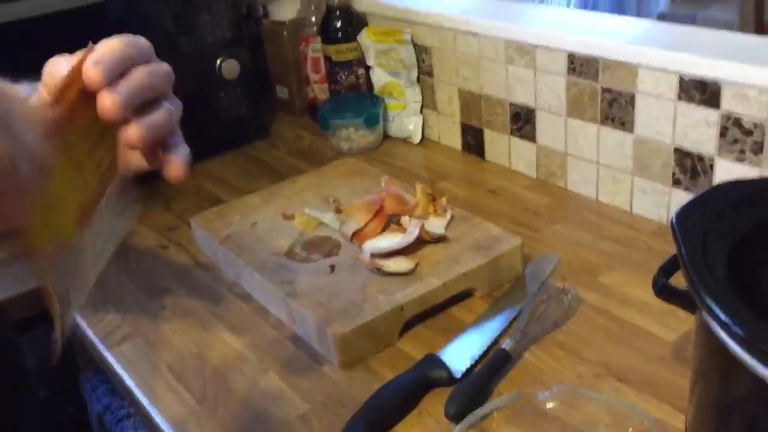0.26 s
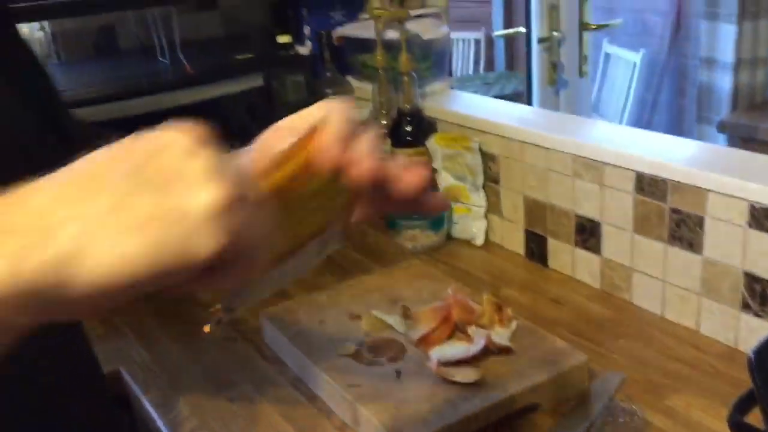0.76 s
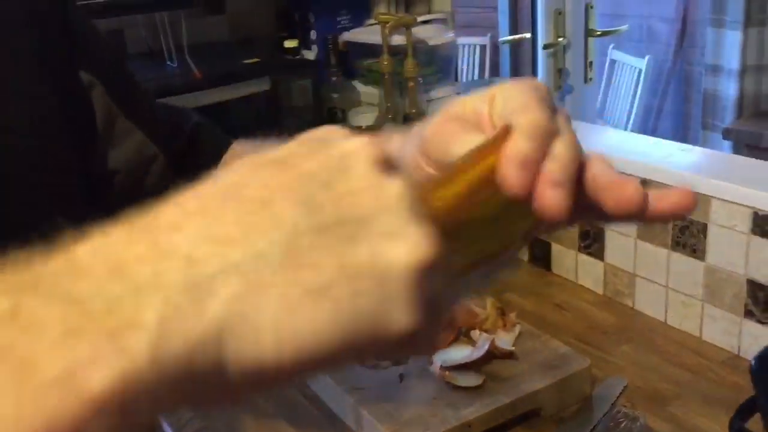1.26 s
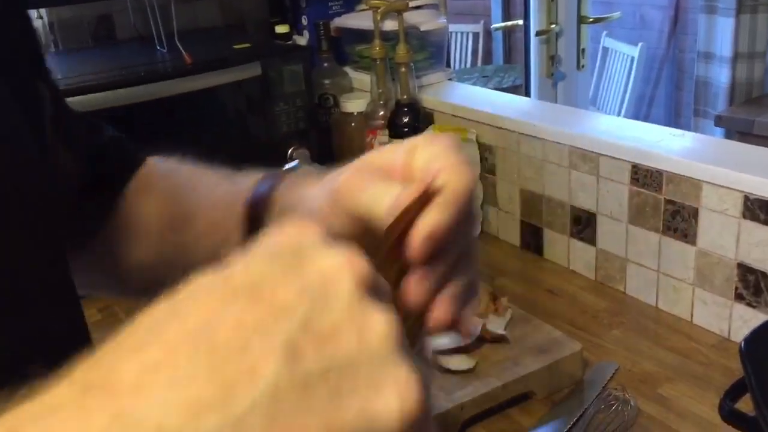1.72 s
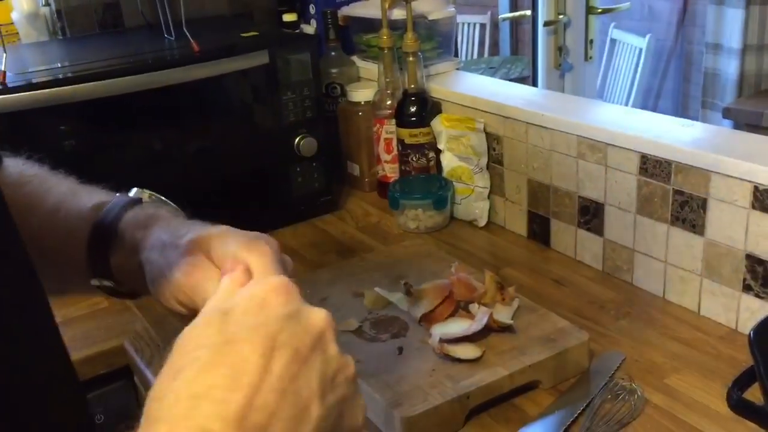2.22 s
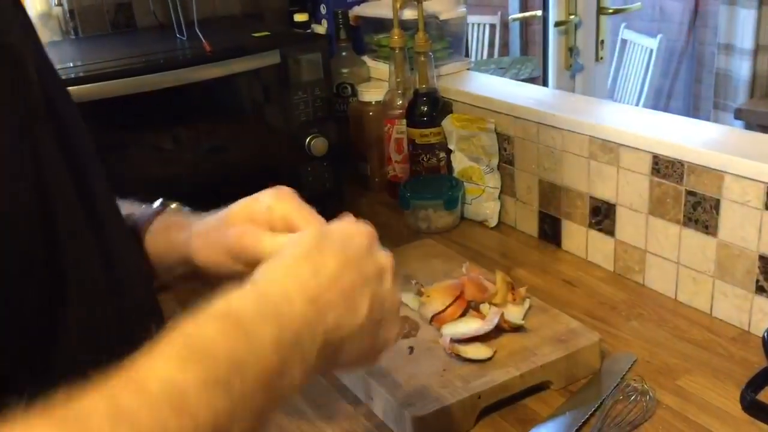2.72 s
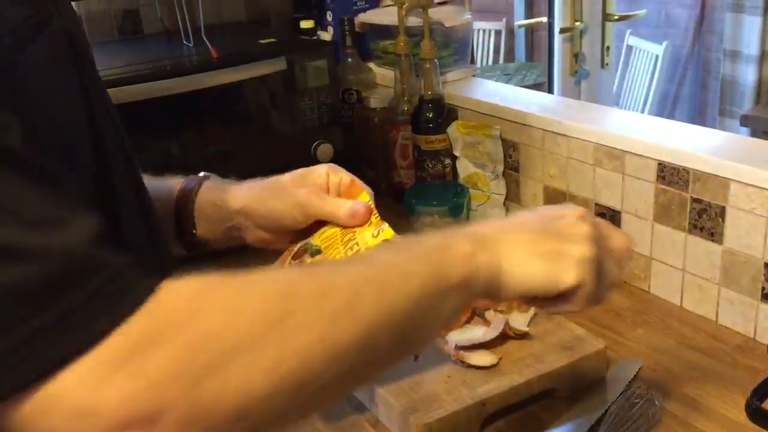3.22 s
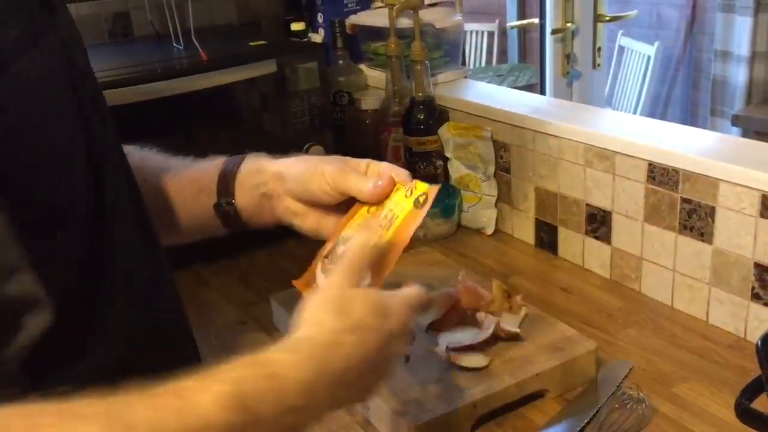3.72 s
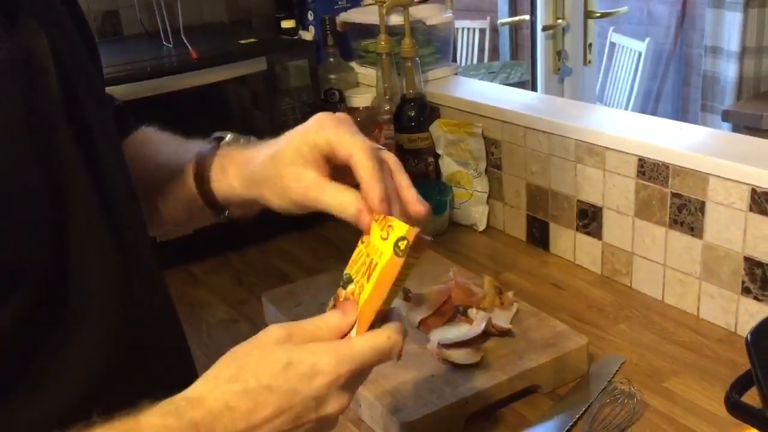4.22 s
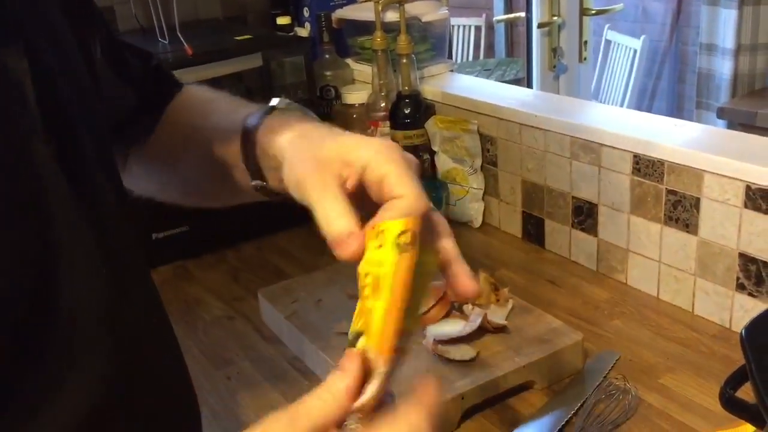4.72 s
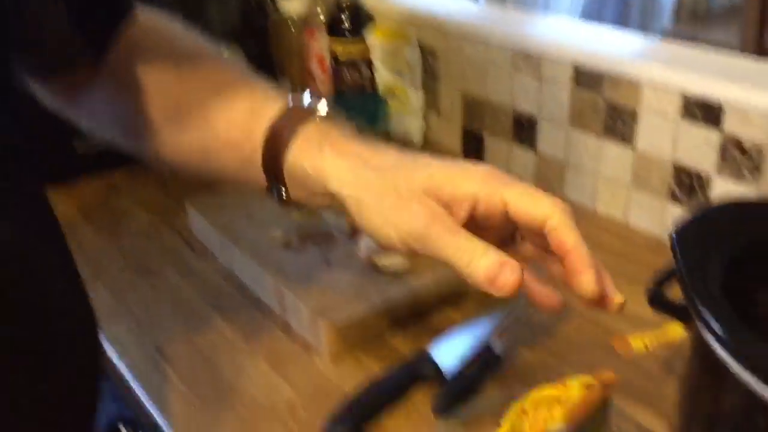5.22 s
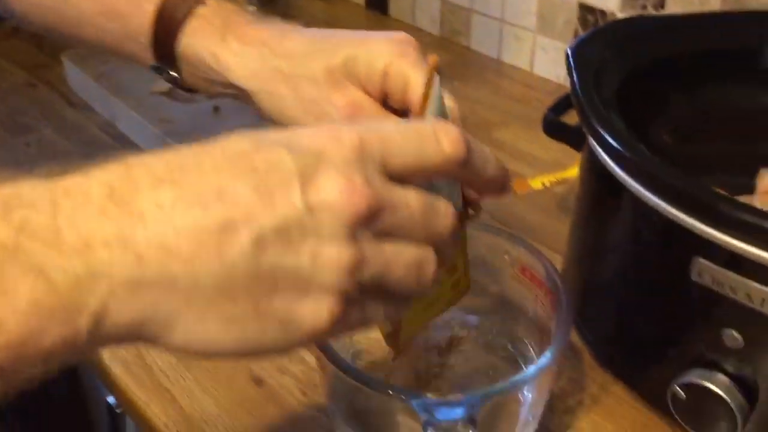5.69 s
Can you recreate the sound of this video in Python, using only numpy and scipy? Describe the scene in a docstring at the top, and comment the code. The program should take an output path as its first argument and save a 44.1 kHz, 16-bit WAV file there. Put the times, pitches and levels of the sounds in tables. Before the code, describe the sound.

A small, quiet kitchen, heard by one close microphone, with short hard reflections and faint room air. From 0 to 0.3 s a foil-paper sachet gives light rustles and a few ticks. From about 0.35 to 1.8 s it is vigorously crumpled: dense, irregular, sharp snaps and papery pops over fine crackle, loudest around 0.75 to 1.6 s, with soft dull hand pushes beneath. From 1.8 to 2.95 s the crackling thins to separate snaps with gaps. At about 2.98 to 3.2 s a quick, gritty rip tears the top off, ending in a tiny flick. Near silence follows, with a small tick around 3.55 s. From 3.85 to 5.2 s come sparse, lighter crinkles and pops, brightest near 4.04 and 4.87 s. Around 5.4 s powder slides with a short fizz over a dull low thump; faint hollow knocks follow, then soft crinkles and a weak glass ring at 5.8 s.

```python
"""In a small kitchen, hands shake down and crumple a foil-paper sachet, tear off its top and pinch it open.
The film buckles in sharp snaps over a fine crackle: bursts of random slips and breaks, coloured by rings.
The tear is a dense run of tiny breaks; soft pushes of the hands are short puffs of noise.
At the end powder slides inside as a fizz, and the sachet brushes a glass jug, a dying sine tone.
Echoes and a short tail make the kitchen answer; one microphone hears it all, over quiet room air."""
import sys
import numpy as np
from scipy import signal
from scipy.fft import rfft, irfft
from scipy.io import wavfile
from scipy.ndimage import uniform_filter1d

SR = 44100
rng = np.random.default_rng(int(sys.argv[2]) if len(sys.argv) > 2 else 0)


def digitize_waveform(pressure):
    """Quantize a signal to 16-bit integers and store it at the path in sys.argv[1].

    Rows of a 2-D input are taken as channels; values are limited to [-1, 1].
    """
    field = np.atleast_2d(pressure).T
    bounded = np.clip(field, -1, 1)
    quanta = np.round(bounded * 32767).astype(np.int16)
    wavfile.write(sys.argv[1], SR, quanta)


N = 262527
TIME = np.arange(N) / SR  # s


def amp(db):
    """Decibels to gain."""
    return 10 ** (np.asarray(db) / 20)


def unit(x):
    """x at rms 1."""
    return x / np.sqrt(np.mean(x ** 2) + 1e-20)


def read(points, hz):
    """A table of (Hz, value) read on a log-frequency axis."""
    f, value = np.transpose(points)
    return np.interp(np.log(hz + 1), np.log(f + 1), value)


def add(mix, s, sound):
    """Mixes a sound in at time s."""
    part = mix[max(round(s * SR), 0):][:len(sound)]
    part += sound[:len(part)]


def swell(start, length, rise_db_per_s, fall_db_per_s):
    """Attack, hold and release, in dB relative to the held level."""
    before = np.maximum(start - TIME, 0)
    after = np.maximum(TIME - start - length, 0)
    return -rise_db_per_s * before - fall_db_per_s * after


def causal(db_of_hz, size=2048):
    """The shortest causal ring that has a given spectrum (minimum phase); energy 1."""
    db = db_of_hz(np.fft.rfftfreq(size, 1 / SR))
    cepstrum = irfft(np.log(amp(np.maximum(db - db.max(), -100))))
    # folding the cepstrum forward in time packs the energy at the start
    cepstrum[1:size // 2] *= 2
    cepstrum[size // 2 + 1:] = 0
    ring = irfft(np.exp(rfft(cepstrum)))
    return ring / np.linalg.norm(ring)


def coloured(x, points):
    """x through a spectrum, at rms 1."""
    ring = causal(lambda hz: read(points, hz))
    return unit(signal.oaconvolve(x, ring)[:N])


def ringing(modes):
    """Half a second of dying sine tones (pitch_hz, level_db, t60_s: the time to fall 60 dB)."""
    t = np.arange(SR // 2) / SR
    return sum(amp(db - 60 * t / t60) * np.sin(2 * np.pi * hz * t) for hz, db, t60 in modes)


def resonate(x, hz, width_hz):
    """One resonance of gain 1 that follows the curve hz: shift down to 0 Hz, smooth, shift back."""
    turn = np.exp(2j * np.pi * np.cumsum(hz) / SR)
    r = np.exp(-np.pi * width_hz / SR)
    return 2 * (turn * signal.lfilter([1 - r], [1, -r], x / turn)).real


def breaks(per_s, spread_db, most=2.8):
    """Random tiny breaks of either sign, a few much larger than the rest."""
    size = amp(spread_db * np.minimum(rng.exponential(1, N), most))
    return size * rng.choice([-1, 1], N) * (rng.random(N) < per_s / SR)


def patch(hz, centre_hz, below, above, knee=0.16, bass_hz=320):
    """Spectrum (dB) of a flexing patch of film: one broad peak; too small to radiate bass."""
    octaves = np.log2((hz + 1) / centre_hz)
    away = np.hypot(octaves, knee)  # distance from the centre, rounded at the peak
    flanks = max(below, 0) * (away - octaves) + max(above, 0) * (away + octaves)  # slopes in dB/octave
    bass_loss = 10 * np.log10(1 + (bass_hz / (hz + 1)) ** 3)
    return -flanks / 2 - bass_loss


def bump(hz, ring_hz, octaves=0.19):
    """Shape of one resonance of a patch, 0 to 1."""
    return np.exp(-(np.log2((hz + 1) / ring_hz) / octaves) ** 2 / 2)


def film(spectrum_db, bumps_db, size=2048):
    """Ring of one crease: chance resonances on its spectrum; bending waves bring the treble first."""
    grid = np.geomspace(200, 20000, 18)  # Hz
    bumps = np.transpose([grid, bumps_db * rng.standard_normal(len(grid))])
    ring = causal(lambda hz: spectrum_db(hz) + read(bumps, hz))
    hz = np.fft.rfftfreq(size, 1 / SR)
    lag_at_1k = rng.uniform(.0002, .0006)  # s; lower pitches lag more
    return irfft(rfft(ring) * np.exp(-4j * np.pi * lag_at_1k * np.sqrt(1000 * hz)))


def crackle(per_s, spread_db, colour, slope=11, count=32):
    """Tiny breaks shared among patches of film of different sizes."""
    out = np.zeros(N)
    for centre_hz in np.geomspace(450, 13000, count):  # small patches ring high, large ones low
        ring = film(lambda hz: patch(hz, centre_hz, slope, slope) + read(colour, hz) / 2, bumps_db=2.0)
        weight = amp(read(colour, centre_hz)) * np.sqrt(centre_hz)
        out += weight * signal.oaconvolve(breaks(per_s / count, spread_db), ring)[:N]
    return unit(out)


def room_air():
    """Quiet room air: steady coloured noise."""
    # spectrum of the quiet room: pitch_hz [Hz], level_db [relative dB]
    air_colour = [(20, -37), (45, -9), (90, 0), (160, -2.5), (350, -8.5), (700, -11.5), (1500, -11),
                  (4000, -15), (10000, -20), (16000, -25)]
    return amp(-69.5) * coloured(rng.standard_normal(N), air_colour)


def effort():
    """Levels (dB) of the creasing and of the fizz, following the finger strokes and the sliding powder."""
    # strokes of the fingers: start_s [s], length_s [s], crease_level_db [dB],
    # fizz_level_db of powder and fibres [dB]
    strokes = [(0.0, 0.046, -55, -60), (0.104, 0.075, -71, -59), (0.243, 0.018, -46.5, -57),
               (0.346, 0.34, -43.5, -50.5), (0.703, 0.21, -40.5, -46), (0.945, 0.43, -45, -44),
               (1.425, 0.32, -45.5, -54), (1.797, 0.1, -52.5, -82), (1.935, 0.16, -51, -60.5),
               (2.197, 0.019, -80, -58), (2.305, 0.18, -58, -65), (2.6, 0.056, -49, -56),
               (2.647, 0.057, -52, -47), (2.825, .15, -46, -53.5), (3.789, .07, -74, -67),
               (3.862, 0.054, -58, -58.5), (4.018, 0.13, -60, -55), (4.15, 0.043, -69, -59.5),
               (4.289, 0.013, -56.5, -52), (4.567, 0.31, -70, -67), (4.775, 0.093, -48.5, -56.5),
               (4.99, 0.11, -67, -66), (5.134, 0.009, -69, -55.5), (5.44, 0.091, -65, -73),
               (5.517, 0.2, -73.5, -68), (5.769, 0.11, -65, -55), (5.896, 0.037, -61, -56.5)]
    grip_db_per_s, relax_db_per_s = 815, 458.5  # how fast a stroke swells and dies away
    crease = np.full(N, -140.)
    # powder slides to one end as the sachet is tipped: level in dB, times in s, slopes in dB/s
    fizz = -55 + swell(5.41, 0.079, rise_db_per_s=196, fall_db_per_s=400)
    for start, length, crease_db, fizz_db in strokes:
        shape = swell(start, length, grip_db_per_s, relax_db_per_s)
        crease = np.maximum(crease, crease_db + shape)
        fizz = np.maximum(fizz, fizz_db + shape)
    return crease, fizz


def clumps(depth_db=3, length_s=.007):
    """The film gives way in fits and starts: a gain that jumps about quickly, at rms 1."""
    knots = rng.standard_normal(N // 100)
    return unit(amp(depth_db * np.interp(TIME / length_s, np.arange(len(knots)), knots)))


def handling(level, fizz, rub_db=-16):
    """Fingers crease and rub the film (breaks and noise); powder and fibres fizz on it (finer breaks)."""
    # spectra of the creasing and of the fizz: pitch_hz [Hz], level_db [relative dB]
    crease_colour = [(60, -13), (200, -11.5), (400, -11.5), (650, -3), (900, -3.5), (1500, -7), (3000, -10),
                     (5000, -10), (8000, -21.5), (16000, -30)]
    fizz_colour = [(500, -11), (2000, 0), (4500, 0), (8000, -2), (12000, 0), (16000, -4.5)]
    # the pouch wall resonates higher or lower as the grip changes: time_s [s], pitch_hz [Hz]
    wall = [(0.0, 720), (0.42, 815), (0.68, 683), (0.77, 1533), (1.03, 1300), (1.2, 1710), (1.36, 1240),
            (1.62, 1610), (1.98, 800), (2.62, 1148), (2.92, 1310), (4.85, 1525), (5.9, 1100)]
    creases = crackle(700, 3.6, crease_colour)
    wall_hz = np.interp(TIME, *np.transpose(wall))
    creases = unit(creases + amp(-0.5) * resonate(creases, wall_hz, width_hz=340))
    rub = amp(rub_db) * coloured(rng.standard_normal(N), crease_colour)
    grains = coloured(breaks(6000, 5.8), fizz_colour)
    return clumps() * (amp(level) * (creases + rub) + amp(fizz) * grains)


def pushes():
    """Soft pushes and slides of the hands on the packet: puffs of noise around one pitch."""
    # start_s [s], peak_level_db [dB], pitch_hz [Hz], length_s (the peak comes after a quarter) [s]
    push_table = [(0.0, -45, 700, 0.045), (0.072, -50.5, 735, 0.031), (0.399, -55, 740, 0.17),
                  (0.541, -52, 123, 0.036), (1.10, -52, 108.5, 0.046), (1.24, -62.5, 75, 0.051),
                  (1.58, -61.5, 62, .06), (1.564, -47, 149, 0.029), (1.578, -42, 450, 0.042),
                  (2.887, -48, 202, 0.052), (2.613, -48, 425, 0.042), (3.549, -63.5, 970, 0.02),
                  (3.84, -56.5, 724, .012), (3.899, -55, 198, 0.044), (4.044, -51, 307, 0.039),
                  (5.037, -46, 195, 0.02), (5.071, -61, 215, .025), (5.429, -58, 330, 0.028),
                  (5.784, -61, 181, 0.047), (5.811, -57, 316, 0.025), (4.541, -52.5, 342, 0.042),
                  (4.812, -56, 322, 0.035), (5.91, -64, 270, 0.054)]
    out, t = np.zeros(N), np.arange(SR // 2) / SR
    for s, db, centre_hz, length in push_table:
        ring = causal(lambda hz: patch(hz, centre_hz, 21, 15.4, bass_hz=50))
        puff = signal.fftconvolve(rng.standard_normal(len(t)), ring, "same")
        u = t / (length / 4)
        shape = u * np.exp(1 - u)  # peaks at 1
        add(out, s, amp(db) * unit(puff * shape) * np.sqrt(np.mean(shape ** 2)))
    return out


def shower(t, per_s, decay_s, spread_db=2.5):
    """Slips of uneven size that die away after t = 0; energy 1."""
    size = amp(spread_db * np.minimum(rng.exponential(1, len(t)), 3)) * rng.choice([-1, 1], len(t))
    happens = (rng.random(len(t)) < per_s / SR) * (t >= 0)
    return unit(size * happens * np.exp(-abs(t) / decay_s)) / np.sqrt(len(t))


def mirrored(sound, gain=0.36, shortest_s=.0003, longest_s=0.001385):
    """The palm or the other wall of the pouch throws a snap straight back, notching its spectrum."""
    delay = round(rng.uniform(shortest_s, longest_s) * SR)
    echo = gain * rng.choice([-1, 1]) * np.pad(sound, (delay, 0))
    return np.pad(sound, (0, delay)) + echo


def snap(s, db, spectrum_db, settle, single_s=0.0013, yield_db=-13, yield_s=0.0048, slow_s=0.0028,
         relax_db=-15, relax_s=0.019, size=1024):
    """The crease starts to yield (more so if slow), buckles, settles in slips and relaxes with late ticks."""
    t = (np.arange(3 * size) - size) / SR  # the buckle itself is at t = 0
    slips = shower(t, 5000, settle) + amp(relax_db) * shower(t, 260, relax_s, spread_db=3.5)
    slips += amp(yield_db) * np.tanh(settle / slow_s) ** 2 * shower(-t, 2500, yield_s)
    slips[size] += min(single_s / settle, 2) ** 2 / 2  # quick creases go in one sharp break
    # the slips are made white; the patch gives the colour
    power = uniform_filter1d(abs(rfft(slips)) ** 2, size=22) + 1e-9
    whiten = causal(lambda hz: np.interp(hz, np.fft.rfftfreq(len(t), 1 / SR), -10 * np.log10(power)))
    white = signal.fftconvolve(slips, whiten)
    sound = mirrored(signal.fftconvolve(white, film(spectrum_db, bumps_db=1.0)))
    level = amp(db) * np.sqrt(.005 * SR)  # db is the level if all the energy fell within 5 ms
    return s + t[0], level * sound / np.linalg.norm(sound)


def snaps():
    """All the large buckles, from sharp creases to hollow pops, each with its own two resonances."""
    # buckling creases: time_s [s], level_db over 5 ms [dB], pitch_hz of the flexing patch [Hz],
    # bass and treble roll-off [dB/octave, below 0 counts as 0], settling_s [s],
    # lower resonance pitch_hz [Hz] and height_db [dB], upper resonance pitch_hz [Hz] and height_db [dB]
    snap_table = [(0.062, -41.5, 2180, 8, 25, 0.0023, 754, 13, 2500, 4),
                  (0.224, -46.9, 2070.0, 5.0, 16.0, 0.0017, 537, 16, 716, 16),
                  (0.2385, -40, 920.0, 5.5, 7.0, 0.004, 730.0, 5, 4160, 13),
                  (0.335, -38.5, 3950.0, 3.5, 13.0, 0.0094, 540.0, 16, 780, 15),
                  (0.364, -25, 5470.0, 3.0, 8.5, 0.0044, 880.0, 15.5, 1650.0, 10.0),
                  (0.381, -36.5, 490.0, 6.5, 4.5, 0.0012, 3900, 15, 6690.0, 4.0),
                  (0.417, -36.1, 2340.0, 10, 9, 0.0013, 1010.0, 4, 1510.0, 7),
                  (0.4268, -34, 3670.0, -1, 12, 0.0006, 646, 13.5, 890.0, 25),
                  (0.4423, -27, 2370.0, 6.5, 9, 0.0036, 630, 20.5, 890, 15),
                  (0.4485, -27.5, 780.0, 8, 3, 0.0024, 4400, 5.0, 6270.0, 7),
                  (0.454, -28.5, 8110.0, 0.0, 19, 0.0021, 586, 8, 1940.0, 8),
                  (0.4709, -32.9, 2940.0, 7, 16, 0.0033, 650.0, 6, 860.0, 14),
                  (0.4864, -32, 1850.0, 9, 6, 0.00095, 4870.0, 5.0, 7890.0, 7.0),
                  (0.5257, -27.5, 8700, 3, 21, 0.0012, 550.0, 5.5, 720.0, 13),
                  (0.5422, -20.5, 1680.0, 1.5, 4.5, 0.0034, 650.0, -2, 2450, 7),
                  (0.559, -36.5, 4410.0, -1.5, 16, 0.0015, 1630.0, 8, 2330, 7.0),
                  (0.565, -31, 1910.0, 0.5, 7.0, 0.0032, 760.0, 7, 7820.0, 6.0),
                  (0.607, -36, 640.0, 8, 4, 0.0039, 830.0, 9.5, 2230.0, 11.0),
                  (0.6331, -30.5, 1220.0, 11.0, 10, 0.0035, 543, 7.0, 786, 11.0),
                  (0.639, -31, 4900.0, 4, 14, 0.0011, 620.0, 14.0, 925, 14),
                  (0.6579, -30.0, 840.0, 11.5, 8.5, 0.0018, 2450, 10.5, 4530.0, 9),
                  (0.663, -33, 710.0, 25, 8.5, 0.0027, 2690.0, 5, 4490.0, 8.0),
                  (0.6879, -30, 3530.0, 1.5, 13, 0.0034, 600.0, 8.0, 2140, 10),
                  (0.72, -34, 1840.0, 9.0, 12, 0.0009, 7010.0, 15.5, 10200.0, 11),
                  (0.726, -31, 3590.0, 3, 11, 0.0041, 596, 11, 1820.0, 5),
                  (0.756, -20, 1430, 18, 11.5, 0.0014, 550.0, 9, 800, 12.5),
                  (0.7941, -25, 2060, 4, 7.5, 0.0027, 596, 13.5, 6390.0, 10),
                  (0.8212, -24.5, 3970.0, 2.5, 5.0, 0.0028, 820.0, 7.5, 1370, 8),
                  (0.827, -33.5, 500.0, 11, 2.5, 0.0013, 1410.0, 12, 8760.0, 5),
                  (0.8405, -26.5, 760, 14.0, 2.5, 0.0025, 620.0, 9, 1550.0, 10),
                  (0.8699, -28, 1630.0, 2, 6.0, 0.0015, 740, 10, 6210.0, 7),
                  (0.873, -25, 4700.0, 0.5, 11, 0.0023, 610, 8.5, 850, 1),
                  (0.8889, -27.5, 700.0, 4, 3.5, 0.0022, 1370.0, 14.5, 6700.0, 6),
                  (0.898, -27.5, 2250.0, -0.5, 9, 0.0012, 720.0, 8.5, 1370, 11.0),
                  (0.935, -25.5, 2440.0, 5.0, 7.0, 0.0052, 710.0, 8.5, 1280, 9),
                  (0.9661, -17.5, 1220.0, 8.0, 7.0, 0.00089, 3130, 7.5, 5620.0, 9),
                  (0.986, -28.4, 1540.0, 10, 10, 0.005, 444, 9.5, 650, 22),
                  (1.006, -25, 4820.0, 3.5, 15.0, 0.0022, 800.0, 8, 1370.0, 8),
                  (1.013, -24.5, 2050.0, -6, 4, 0.00066, 1100.0, 16, 1520, 12),
                  (1.0222, -20.2, 970.0, 19, 4.5, 0.0005, 1290, 8.5, 4030.0, 10.0),
                  (1.0277, -27, 1350.0, 2.5, 6.5, 0.00055, 680.0, 7, 1910.0, 11),
                  (1.0407, -23.3, 740.0, 8, 6.0, 0.003, 1240, 9, 2260.0, 5),
                  (1.062, -27, 3320.0, 6.5, 8.5, 0.0048, 1370.0, 4, 8520.0, 4),
                  (1.0782, -26.5, 1110.0, 0.0, 4.5, 0.0013, 820, 9, 1650, 8),
                  (1.092, -28.0, 3990.0, 5, 9.0, 0.001, 960.0, 9.5, 1580.0, 5),
                  (1.098, -22.5, 2320.0, 4.0, 6.5, 0.0013, 650.0, 6, 1200, 12),
                  (1.1129, -24, 6200.0, 0.0, 13.0, 0.0016, 427, 4, 3400, 7),
                  (1.133, -23, 4040.0, 1.0, 17, 0.00074, 1340.0, 10.5, 7590.0, 4),
                  (1.136, -24, 1470.0, 3.5, 3.5, 0.0043, 1010.0, 8.5, 5560.0, 6),
                  (1.1566, -25.5, 3470.0, 2.0, 4.5, 0.0006, 420.0, 10, 3320.0, 4.0),
                  (1.165, -33, 1720.0, 0.0, 2.5, 0.0006, 513, 6, 6830.0, 1),
                  (1.184, -26, 1200.0, 10, 8.5, 0.0037, 557, 12, 3560.0, 3),
                  (1.204, -23, 4990.0, 0, 12.0, 0.0085, 1540, 9.5, 3100, 10),
                  (1.213, -23.5, 3380.0, 5.5, 12, 0.0006, 656, 7, 1750.0, 4),
                  (1.2229, -24.5, 480.0, 1.5, 2, 0.0014, 1330.0, 14, 7600, 6),
                  (1.242, -30, 3650.0, 3.5, 4, 0.0008, 657, 11.0, 1310.0, 11),
                  (1.2464, -23, 4080.0, 6.5, 8, 0.0031, 1080, 6.5, 1620, 8),
                  (1.2597, -23, 4100.0, 0.0, 13, 0.0019, 2080.0, 4, 3370.0, 3),
                  (1.2807, -22, 1970.0, 0.5, 3.5, 0.00068, 3110.0, 6.0, 11590.0, 8.5),
                  (1.285, -24, 2220.0, 1.5, 3, 0.0022, 1410.0, 13, 2300.0, 12),
                  (1.3149, -23, 3430.0, 2, 7.5, 0.0064, 1160, 10.5, 1690, 11.0),
                  (1.3457, -22.5, 1340, 3, 6.0, 0.0011, 533, 11, 11590.0, 3),
                  (1.352, -31.5, 1210.0, -1, 3, 0.00084, 570.0, 12, 2770.0, 9),
                  (1.388, -28, 3220.0, 4.0, 4.5, 0.0036, 510.0, 8.5, 1740.0, 2),
                  (1.393, -25, 1320, 7, 6, 0.0049, 3520, 7, 5360.0, 5),
                  (1.422, -26.5, 2840.0, 1, 6, 0.0055, 2490.0, 8, 3920.0, 7.0),
                  (1.4655, -18, 2400, 6.5, 7, 0.0022, 650, 11.5, 1600, 7.5),
                  (1.489, -28.5, 3690.0, 0.5, 7.0, 0.0075, 1280, 13, 2220.0, 0),
                  (1.5, -24.5, 5700, 1.5, 7, 0.0027, 1510.0, 9.5, 2820.0, 4.0),
                  (1.533, -29, 3230.0, 3.5, 10.0, 0.00083, 420.0, 6.5, 1710, 11.0),
                  (1.5473, -24.5, 2880.0, 10, 12, 0.0014, 510.0, 9.0, 835, 12.0),
                  (1.554, -24.5, 3150.0, 3, 5.5, 0.0036, 760.0, 12, 1070.0, 3),
                  (1.56, -20, 1630, 6.0, 7, 0.0015, 440, 11, 680.0, 12),
                  (1.583, -25.2, 1980.0, 1.0, 4, 0.0034, 950.0, 6.5, 1630.0, 7),
                  (1.592, -23, 480.0, 13.0, 5.5, 0.001, 530, 4, 1710.0, 7),
                  (1.6434, -23, 5050.0, 1, 10.5, 0.0042, 435, 10, 11450.0, 5),
                  (1.669, -37, 2790.0, 2, 8.0, 0.0032, 750.0, 8, 1650.0, 10.0),
                  (1.693, -24.5, 4100, 2.0, 10.0, 0.0054, 710.0, 14, 1930, 13.5),
                  (1.7025, -31.4, 3810.0, 3, 10.0, 0.0005, 720.0, 2.0, 3140, 17),
                  (1.716, -39, 6070.0, 2, 19, 0.00053, 420.0, 1, 810.0, 8.0),
                  (1.76, -36, 4700, 0.0, 10.0, 0.0021, 730.0, 9, 5440.0, 9),
                  (1.7984, -23, 1990.0, 6.0, 2.5, 0.00099, 760.0, 8, 5860, 3.0),
                  (1.8089, -29, 9300, 3, 31, 0.00058, 880.0, 12, 1290.0, 14),
                  (1.8835, -37.5, 5670.0, 3.0, 23, 0.0018, 677, 16, 1410.0, 11.0),
                  (1.9499, -23, 715, 23.5, 6.0, 0.0018, 4950.0, 11, 7650, 6.0),
                  (1.964, -43, 5650.0, -2, 17.0, 0.0008, 587, 11.0, 2150.0, 9),
                  (1.9811, -27.5, 1360.0, 2.0, 7.0, 0.0042, 3700, 9, 6560.0, 8),
                  (1.994, -32.5, 4590.0, 0.5, 12, 0.0015, 640, 10, 830, 18),
                  (2.0051, -32.5, 5150.0, 0.5, 15.0, 0.00068, 1700, 12, 2360.0, 6),
                  (2.04, -39.2, 730.0, 7.5, 8, 0.0016, 600.0, 5.0, 1700.0, 12),
                  (2.047, -39, 1470.0, 1, 11, 0.0012, 2140.0, 8.0, 3810.0, 15.0),
                  (2.1213, -36.5, 1790, 5, 8, 0.0019, 890, 8, 4900, 12.0),
                  (2.219, -54.6, 4140, 1.0, -1, 0.0006, 810.0, 5, 11590.0, 9.0),
                  (2.314, -27.5, 2100, 3, 8.0, 0.0043, 1090.0, 4.5, 4330, 9.5),
                  (2.406, -47.5, 640.0, 14, -3, 0.0044, 4790.0, 11, 10340.0, 8.0),
                  (2.4415, -26.5, 3180, 2, 8, 0.0011, 2840, 10, 4450, 12.5),
                  (2.4534, -37, 4800.0, 0.5, 14, 0.0014, 1560.0, 7, 3160.0, 2),
                  (2.547, -48.5, 480.0, -4, 1.0, 0.002, 760.0, 6, 4440.0, 6),
                  (2.594, -36, 1370.0, 7.5, 11, 0.001, 500.0, 8, 4460, 20),
                  (2.614, -39, 790.0, 1.5, 6.0, 0.004, 1500.0, 14, 3130.0, 10),
                  (2.8196, -31.9, 3440, 4.5, 16.5, 0.002, 740.0, 13.5, 9350, 14),
                  (2.848, -28, 3210.0, 0.5, 3.5, 0.0029, 1220, 13.5, 1920, 7.5),
                  (2.8886, -34, 690.0, 2.5, 8.0, 0.0043, 2250.0, 8, 4060.0, 3),
                  (2.9261, -23.5, 536, 7.5, 3.5, 0.0018, 1830, 11.5, 3080, 10),
                  (2.983, -29, 4690.0, 3.5, 8, 0.0035, 690.0, 5, 930.0, 7.0),
                  (3.217, -39.5, 736, 9, 4.5, 0.0029, 1200.0, 6, 4130, 21),
                  (3.5461, -54.5, 790.0, 7.5, 0.5, 0.0012, 910.0, 14.5, 6640.0, 10),
                  (3.5512, -40, 10100, 2.5, 0, 0.0022, 914, 18.5, 6640, 9.0),
                  (3.699, -52, 10000, 1.5, 0, 0.0014, 6000, 3, 10600, 7),
                  (3.7021, -53, 2400, 4, 13, 0.0028, 1730, 8, 2910, 9),
                  (3.8753, -42, 2040.0, 4.5, 14, 0.0044, 540.0, 6, 1490.0, 4),
                  (3.885, -43, 790.0, 1.5, 6, 0.0042, 1620.0, 5, 3220.0, 10),
                  (3.9004, -43.5, 680.0, -1, 4.5, 0.0019, 1340, 12, 3180.0, 8.0),
                  (3.9652, -52.3, 2910.0, 1.0, 15.0, 0.0031, 744, 9, 1640.0, 9.0),
                  (4.0, -46.6, 1080.0, 0.0, 4.5, 0.0059, 630.0, 7, 940.0, 5.0),
                  (4.0191, -32.5, 5580.0, 1.0, 17, 0.0017, 766, 10.5, 1790.0, 10),
                  (4.039, -25.5, 2420, 2.5, 5.5, 0.0037, 2490, 5, 9700, 5),
                  (4.1014, -37, 4090.0, 3.5, 18, 0.0039, 750.0, 5, 1960.0, 8),
                  (4.1312, -36.0, 3950, 1.0, 18, 0.0025, 510, 8.5, 1740.0, 8.5),
                  (4.1786, -47.5, 10090.0, 0.5, -2, 0.00098, 1350.0, 18, 2220.0, 7),
                  (4.316, -41, 3020.0, 2, 5.0, 0.0093, 1080, 6, 1870, 9.0),
                  (4.3373, -49.0, 1760.0, 5.0, 9, 0.0014, 1870, 13, 3260.0, 5),
                  (4.4544, -36.0, 2620.0, 10.5, 20.5, 0.0023, 890, 15.5, 1340.0, 13),
                  (4.472, -42, 2330.0, 3.0, 15, 0.002, 1120, 20, 1810, 12),
                  (4.537, -32.5, 5000, -0.5, 24, 0.0019, 1320.0, 11.5, 2130.0, 5.5),
                  (4.694, -48, 3800.0, 1, 9.0, 0.002, 1250, 16, 1920.0, 19),
                  (4.7506, -37, 1020, 13, 11.5, 0.0018, 1960, 12.0, 6200, 11.0),
                  (4.76, -42.3, 1750.0, 7, 13.0, 0.0015, 420.0, 6, 1040.0, 5),
                  (4.799, -36.4, 4490.0, 2.5, 6.0, 0.0038, 890.0, 2, 1840.0, 6),
                  (4.8117, -34.5, 870.0, 1, 7.5, 0.001, 1550, 14, 2690.0, 13),
                  (4.869, -26, 1730, 4.5, 11.5, 0.001, 1040.0, 11, 1390, 9),
                  (4.8839, -27.5, 1960.0, 15.0, 26, 0.0011, 620.0, 10, 1360, 7.5),
                  (4.897, -41.8, 2010.0, 7, 3, 0.0022, 1310.0, 7.0, 2130.0, 5.0),
                  (5.0349, -35, 480.0, -2.5, 2, 0.0024, 1010, 6.0, 3520, 10),
                  (5.069, -34, 1710.0, 4.5, 16, 0.0011, 685, 0, 930, 13),
                  (5.135, -49, 1980, 6, 23, 0.0084, 1110, 14, 2100, 9),
                  (5.1607, -39, 1430, 13.5, 31, 0.0012, 1030, 13.5, 1750, 6),
                  (5.534, -48.5, 1100, 12, 13, 0.0023, 865, 8, 1700, 4),
                  (5.543, -44.5, 1650, 16, 24, 0.0015, 880, 17, 1910, 3),
                  (5.5605, -53, 1700, 16, 28, 0.0018, 900, 13, 1750, 6),
                  (5.64, -53, 1700, 14, 30, 0.002, 880, 19, 1750, 7),
                  (5.764, -48.7, 2200.0, 2, 12, 0.0028, 900.0, 6, 1740.0, 12),
                  (5.773, -43.7, 1420.0, 7, 6.0, 0.0028, 1110, 13, 1720.0, 7.0),
                  (5.781, -38, 1620.0, 6.5, 6, 0.0021, 790, 16, 1960.0, 8),
                  (5.8092, -35, 1500.0, 7, 9.0, 0.0077, 730, 7.5, 2440.0, 4),
                  (5.898, -49, 900.0, -1.5, 6, 0.0057, 810.0, 16, 1270, 10),
                  (5.909, -45.5, 700.0, -1, 1.5, 0.007, 2120.0, 14, 3940, 8.0)]
    out = np.zeros(N)
    for s, db, centre_hz, below, above, settle, low_hz, low_db, high_hz, high_db in snap_table:
        def spectrum(hz):
            rings = low_db * bump(hz, low_hz) + high_db * bump(hz, high_hz)
            return patch(hz, centre_hz, below, above) + rings
        add(out, *snap(s, db, spectrum, settle))
    return out


def lesser_snaps(level, per_s=30, over_db=2.5, spread_db=6, low_hz=650, high_hz=5060):
    """Small buckles at uneven intervals, their strength scattered about the creasing of the moment."""
    roll_off, settle_s = 10, 0.0017  # dB/octave on both sides, s
    out = np.zeros(N)
    chances = rng.random((int(N / SR * per_s), 3))
    for k, (when, size, strength) in enumerate(chances):
        s = (k + when) / per_s
        centre_hz = low_hz * (high_hz / low_hz) ** size
        db = level[int(s * SR)] + over_db + spread_db * (2 * strength - 1)
        add(out, *snap(s, db, lambda hz: patch(hz, centre_hz, roll_off, roll_off), settle_s))
    return out


def tear():
    """Fibres and foil part in a fast run that also shakes the pouch wall; then the strip slides free."""
    # the tear runs across the top: time_s [s], rip_level_db and
    # shaken_wall_level_db [dB, before the 1 dB cut below]
    tear_table = [(2.97, -62, -66), (2.985, -37, -51), (2.995, -35.5, -45), (3.025, -36.5, -39),
                  (3.055, -34.5, -46.5), (3.072, -32.5, -33.5), (3.11, -35.5, -42.5), (3.168, -37.5, -49),
                  (3.2, -56, -57)]
    # spectra of the rip, the shaken wall and the loose strip: pitch_hz [Hz], level_db [relative dB]
    rip_colour = [(300, -23.5), (700, -9.5), (1400, -1.5), (2700, 0.5), (4200, -4), (6500, -2.5),
                  (7500, -7.5), (11000, -6.5), (16000, -12)]
    wall_colour = [(80, -51), (190, -10.5), (300, -13), (450, -8), (620, 1.5), (850, -0.5), (1050, 0.5),
                   (1600, -12.5), (4000, -32.5)]
    strip_colour = [(200, -34), (500, -21), (680, -1.5), (1050, 2.5), (1350, 1), (1750, -22), (2500, -4),
                    (3000, -6.5), (3900, -2.5), (4600, -5), (7000, -12), (14000, -30)]
    s, rip_db, wall_db = np.transpose(tear_table)
    rip_level = np.interp(TIME, s, rip_db, left=-120, right=-120) - 1
    wall_level = np.interp(TIME, s, wall_db, left=-120, right=-120) - 1
    rip = amp(rip_level) * crackle(7000, 2.5, rip_colour)
    shaken_wall = amp(wall_level) * coloured(breaks(1500, 2.5), wall_colour)
    strip_level = -45 + swell(3.218, 0.032, rise_db_per_s=3001, fall_db_per_s=600)
    strip = amp(strip_level) * coloured(breaks(4000, 3.2), strip_colour)
    return rip + shaken_wall + strip


def swing():
    """A dull, low tone as the sachet is swung round: a sine that swells to a peak and dies away."""
    level = -52.5 + swell(5.425, 0, rise_db_per_s=200, fall_db_per_s=399)
    return amp(level) * np.sin(2 * np.pi * 97.4 * TIME)


def knocks():
    """Light knocks on something hollow: a few dying tones together."""
    # the knocks: time_s [s], level_db added to that of every tone [dB]
    knock_table = [(5.428, -56.5), (5.543, -50), (5.64, -57)]
    # the hollow thing's tones: pitch_hz [Hz], level_db [relative dB], t60_s [s]
    hollow_modes = [(308, -9.5, 0.14), (503, -4, 0.18), (890, -8, 0.11), (1714, -3, .08)]
    out = np.zeros(N)
    for s, db in knock_table:
        add(out, s, amp(db) * ringing(hollow_modes))
    return out


def jug():
    """The sachet touches the glass jug, which rings."""
    # the jug's ring: pitch_hz [Hz], level_db [dB], t60_s [s]
    jug_modes = [(690, -49.5, 0.68)]
    out = np.zeros(N)
    add(out, 5.805, ringing(jug_modes))
    return out


def kitchen(x, wet_db=-8.0, build_s=0.00038, count=3):
    """Near echoes, standing waves and a short tail that shifts as the hands move."""
    # the tail's dying time: pitch_hz [Hz], t60_s [s]; and its colour: pitch_hz [Hz], level_db [relative dB]
    tail_t60 = [(150, 0.38), (500, 0.26), (1400, 0.2665), (3700, 0.3062), (9700, 0.2), (16000, 0.32)]
    tail_colour = [(100, 5.5), (450, 2.5), (620, 5), (850, 5.5), (1300, 2), (1900, 1), (4000, 0.5),
                   (9000, 1.5), (16000, -2.5)]
    # first echoes from hands, counter and tiles: delay_s [s], gain [1 = direct sound]
    echoes = [(.0011, 0.025), (.0024, 0.067), (.0052, 0.078), (.0078, .11), (0.011, 0.067)]
    # standing waves between counter and cupboards: pitch_hz [Hz], level_db [dB], t60_s [s]
    nook = [(328, -51, 0.38), (422.8, -57.5, 0.32), (540, -73.5, 0.16), (613, -65.5, 0.1)]
    t = np.arange(SR // 2) / SR
    near = ringing(nook)
    near[0] = 1  # the direct sound
    for delay, gain in echoes:
        near[round(delay * SR)] += gain
    out = signal.oaconvolve(x, near)[:N]
    for k in range(count):
        taps = rng.choice([-1, 1], len(t)) * (rng.random(len(t)) < 5000 / SR) * (1 - np.exp(-t / build_s))
        hz, when, z = signal.stft(taps, SR, nperseg=512)
        fade = amp(-60 * when / read(tail_t60, hz)[:, None])
        z = z * fade
        # a diffuse tail favours no band
        z *= np.linalg.norm(fade, axis=1, keepdims=True) / np.linalg.norm(z, axis=1, keepdims=True)
        tail = signal.istft(z, SR, nperseg=512)[1]
        tail = signal.fftconvolve(tail, causal(lambda f: read(tail_colour, f)))
        # the hands move, so the paths through the room keep changing
        share = np.cos(np.pi * (2.3 * TIME + k / count)) * np.sqrt(2 / count)
        out += amp(wet_db) * signal.oaconvolve(x * share, tail / np.linalg.norm(tail))[:N]
    return out


def scene():
    """The sachet in the kitchen, over quiet room air; both channels are alike."""
    level, fizz = effort()
    sachet = handling(level, fizz) + snaps() + lesser_snaps(level) + tear()
    dull_sounds = pushes() + swing() + knocks() + jug()  # these get no kitchen echo
    mono = kitchen(sachet) + dull_sounds + room_air()
    return np.array([mono, mono])


def record(dry):
    """The microphone's colour, then a limit on the highest treble."""
    # colour of the microphone close over the counter: pitch_hz [Hz], level_db [dB]
    microphone = [(20, -20.5), (60, 1.5), (250, 0.5), (400, 2.5), (620, 3), (830, -2.5), (1020, -1.5),
                  (1350, 0.5), (4200, 0), (4800, -2.5), (5400, 0), (9600, 0), (10400, -3.5), (11300, 0)]
    heard = signal.oaconvolve(dry, causal(lambda hz: read(microphone, hz))[None])[:, :N]
    low_pass = signal.firwin(255, 16100, window=("kaiser", 8), fs=SR)  # cutoff in Hz
    return signal.oaconvolve(heard, low_pass[None], "same")


dry = scene()
out = record(dry)
digitize_waveform(out)
```